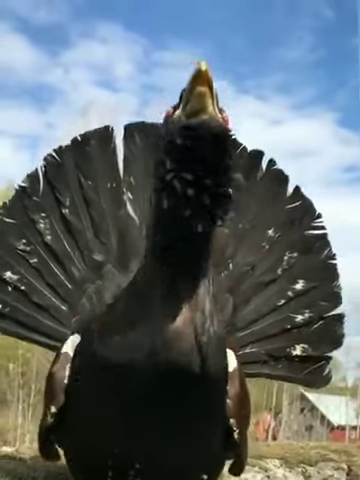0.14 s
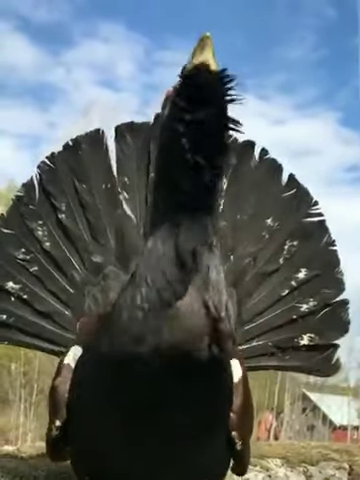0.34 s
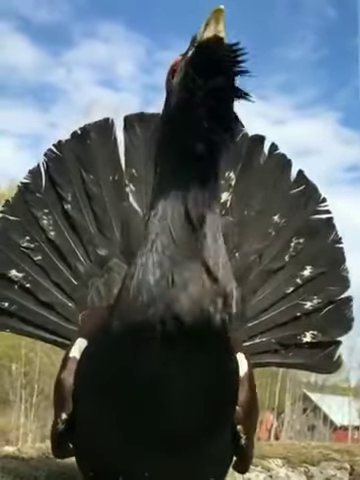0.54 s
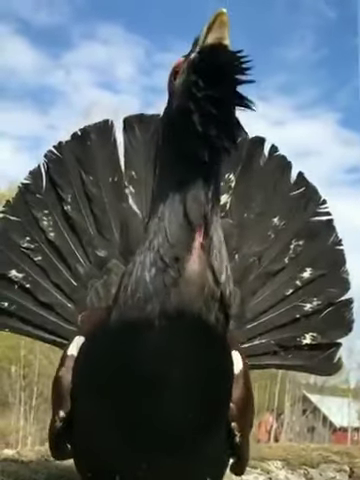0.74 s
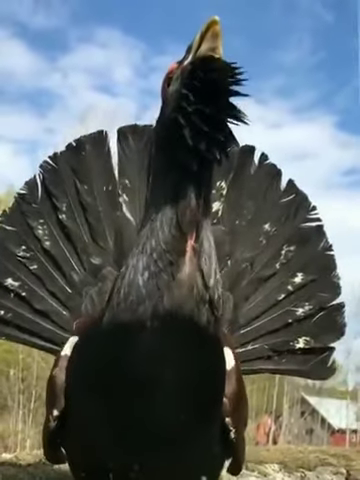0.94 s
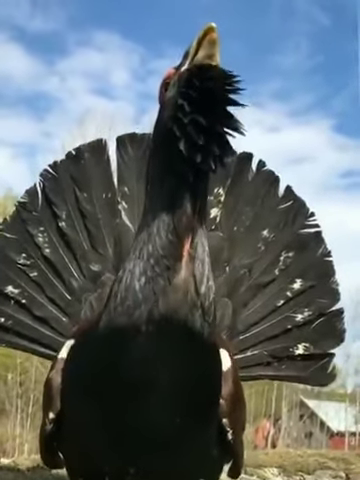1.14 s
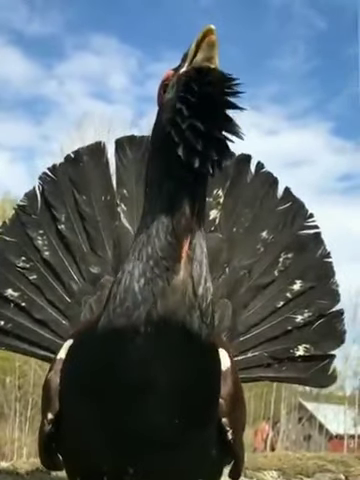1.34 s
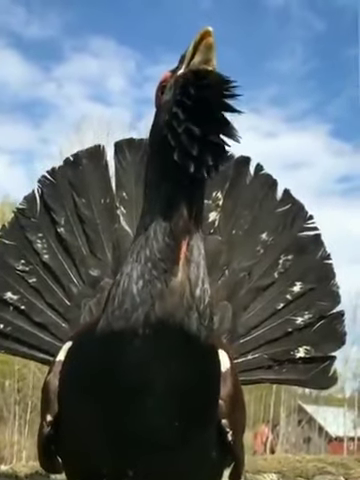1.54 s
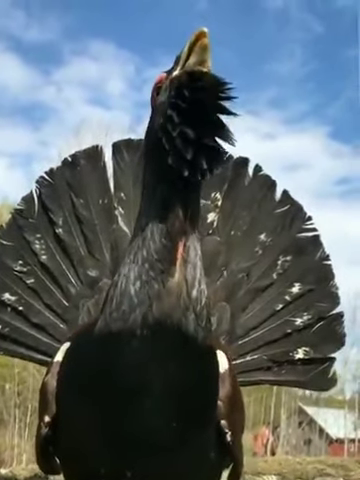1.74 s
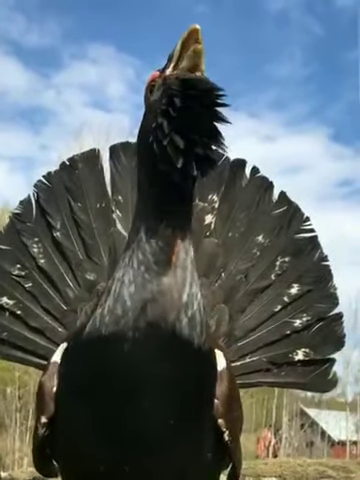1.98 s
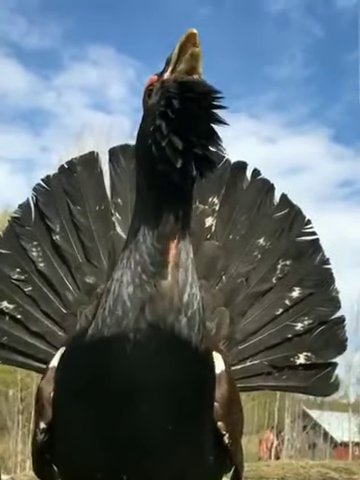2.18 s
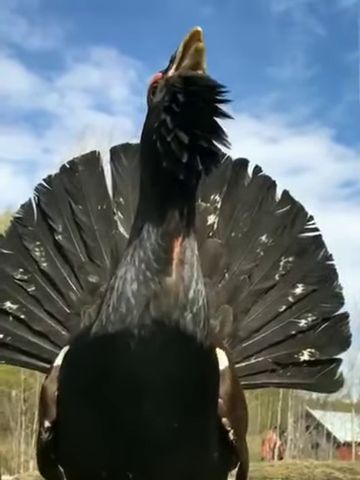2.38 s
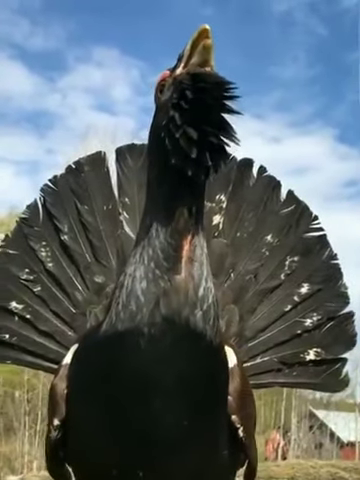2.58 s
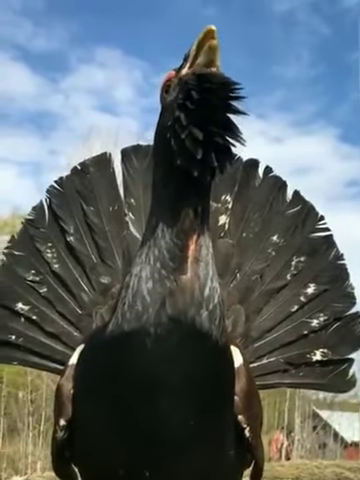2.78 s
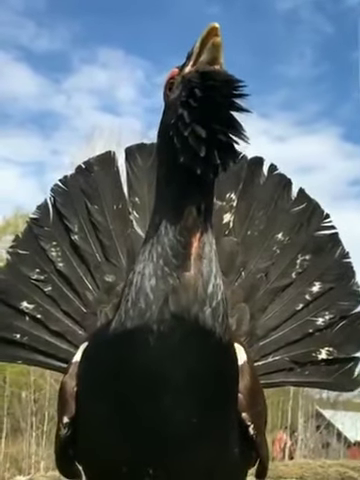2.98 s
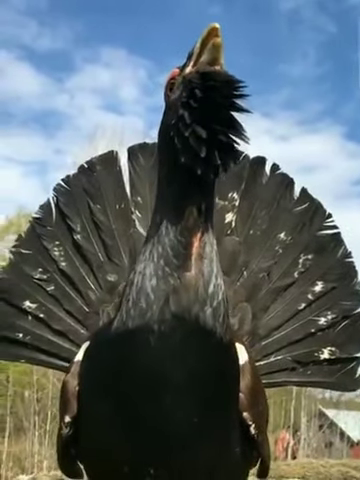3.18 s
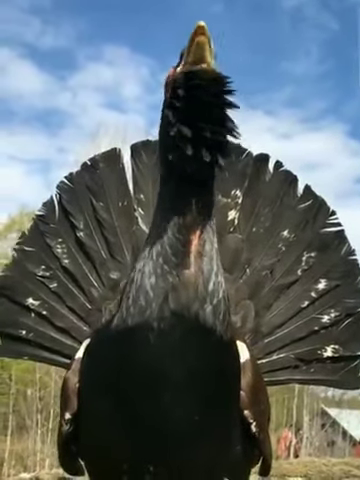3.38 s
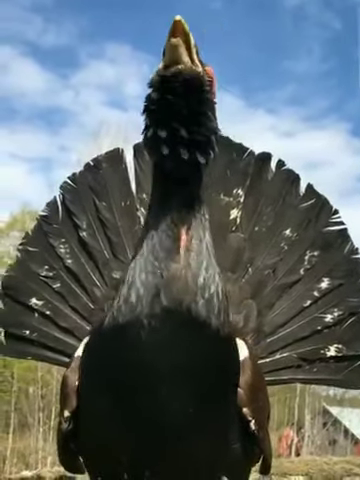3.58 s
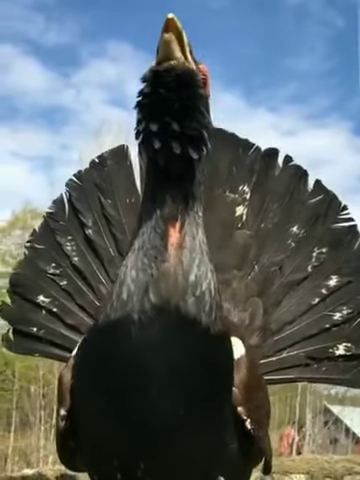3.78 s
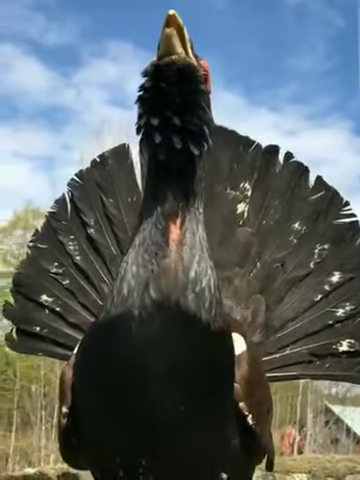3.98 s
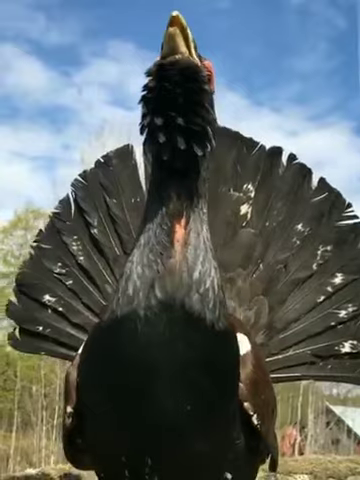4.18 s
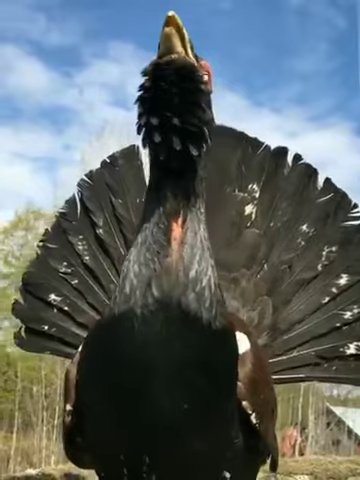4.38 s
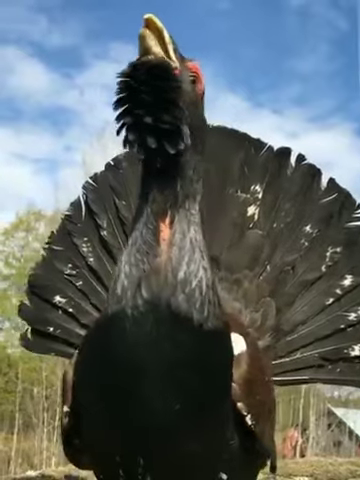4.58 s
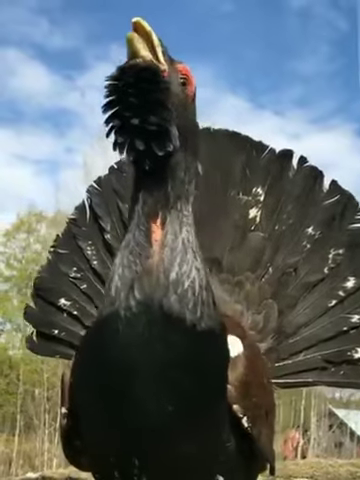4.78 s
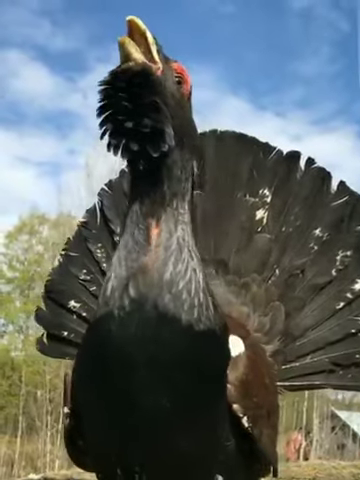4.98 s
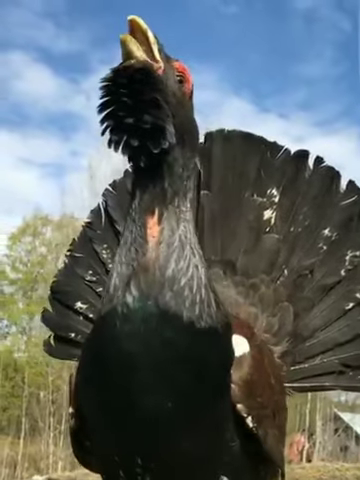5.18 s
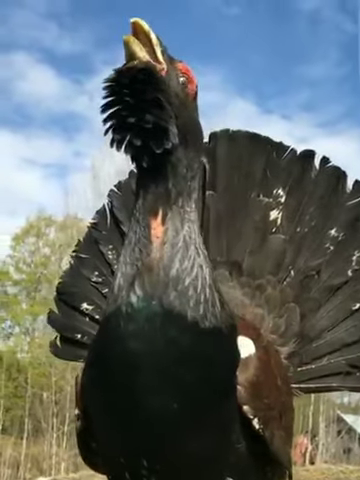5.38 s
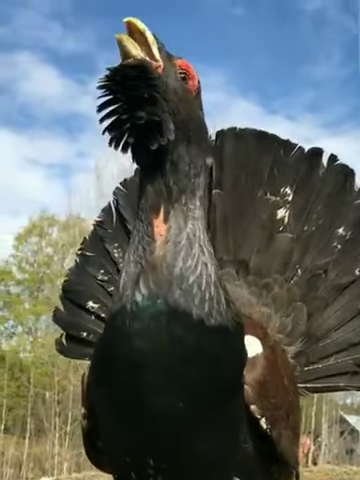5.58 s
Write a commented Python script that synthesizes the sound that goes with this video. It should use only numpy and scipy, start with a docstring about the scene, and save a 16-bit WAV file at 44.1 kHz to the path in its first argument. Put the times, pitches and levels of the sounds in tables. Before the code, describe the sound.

A large forest bird gives a cork-like pop running into a rasping, rattling scrape, then three lone hollow clicks over faint engine hum and light wind.

```python
"""Forest edge, a male capercaillie close to the microphone: the faint ringing end of a click made just before
the start, then a cork-like pop of ringing modes runs into scraping strokes of hissing, rattling air, with low
gulps; his grainy feathers rustle and snap. Three lone, hollow clicks follow. From about 1.2 s light wind bumps
the microphone with short low swings; from about 2.5 s small far songbirds whistle gliding dips and slurs.
All through, a far engine hums on two wavering tones in the soft coloured noise of open air."""
import sys
import numpy as np
from scipy import signal
from scipy.fft import rfft, irfft, next_fast_len
from scipy.io import wavfile
from scipy.ndimage import uniform_filter1d

SR = 44100
rng = np.random.default_rng(int(sys.argv[2]) if len(sys.argv) > 2 else 0)


def master_out(mix):
    """Clip the mix to full scale and print it as 16-bit PCM to the path in sys.argv[1]."""
    frames = np.transpose(np.atleast_2d(mix))
    ceiling = np.clip(frames, -1, 1)
    pcm = np.round(ceiling * 32767).astype(np.int16)
    wavfile.write(sys.argv[1], SR, pcm)


N = 248283
TIME = np.arange(N) / SR

# Levels in the tables are relative; they are taken before the trims, reflections and final filters.

# Close by: clicks of bill and throat; the first row is the ringing end of a click made just before the start:
# (t/s, level/dB, mouth pitch factor, crack level/dB, hollow level/dB)
BILL_CLICKS = [(0.0004, -14, 1, -6, -3), (0.1698, 2, 1, 1.5, -1), (0.2718, -18, .85, 13, 5),
               (1.8722, 1, .98, 1.5, -.5), (3.4469, -1.5, 1.005, 1, -1), (4.8585, -.5, 1, .5, -.5)]
# Soft after-clicks as the throat relaxes: (t/s, level/dB)
THROAT_AFTER_CLICKS = [(2.016, -39.5), (2.041, -45), (3.482, -39), (3.577, -36), (3.59, -45), (4.984, -39),
                       (5.007, -48)]
# Modes of the inflated neck: (f/Hz, level/dB, t60/s)
NECK_MODES = [(200, -23, .024), (315, -16.5, .021), (422, -18.5, .039), (570, -36, .03), (855, -29.5, .042),
              (1598, -27, .058)]
# Modes of the open mouth, before the pitch factor: (f/Hz, level/dB, t60/s)
MOUTH_MODES = [(2288, -13.5, .036), (2730, -20, .027), (3075, -23, .024), (3315, -17.5, .025),
               (3900, -20, .019), (4380, -28, .02), (5730, -33, .028), (6550, -41, .02)]
# Spectrum of the crack that starts a click: (f/Hz, level/dB)
CRACK_SPECTRUM = [(600, -30), (1700, -24), (2300, -3), (3150, 0), (4100, -5), (5000, -19), (7800, -26),
                  (8700, -37), (10200, -28), (15500, -47)]
# Spectrum of the short puff of air in each click: (f/Hz, level/dB per Hz)
PUFF_SPECTRUM = [(1000, -13), (2600, 1.5), (4200, 1.5), (5200, -11.5), (7800, -17), (8700, -20.5),
                 (10300, -14), (15500, -23.5)]

# Scraping strokes, pitches as at the top of the stroke:
# (top t/s, length/s, level/dB, throat f/Hz, whistle f/Hz, whistle level/dB, rattle share of power 0-1)
SCRAPE_STROKES = [(0.183, 0.042, -25.5, 4270, 7070, 10.5, 0.17), (.213, 0.073, -25.5, 2310, 5730, 14, 0.12),
                  (0.253, 0.035, -29.5, 2830, 5400, -9, 0.5), (.286, 0.05, -29.5, 2910, 5170, 18, .2),
                  (0.341, 0.076, -36, 3010, 5060, 16.5, 0.2), (.363, 0.052, -22.5, 2935, 5150, 14, 0.7),
                  (.388, 0.046, -26.5, 2665, 4310, 11, .8), (0.425, 0.039, -34, 1740, 3500, -2, 0.74),
                  (0.439, 0.048, -32, 3360, 5370, 13.5, 0.6), (0.494, 0.091, -45, 3320, 5060, 15, 0.43)]
# Spectrum of the scraping air: (f/Hz, level/dB per Hz)
SCRAPE_SPECTRUM = [(200, -11.5), (800, -13.5), (1080, -22), (1500, -2.5), (1850, -3), (2700, -4),
                   (3500, -6), (5400, -7), (6100, -6.5), (7600, -7.5), (8500, -20), (9600, -11.5),
                   (12800, -18), (15800, -31)]
# Steady resonances of the windpipe: (f/Hz, width/Hz, level/dB)
WINDPIPE_RESONANCES = [(1441, 70, 1), (2190, 60, 1), (2590, 50, 3), (3012, 45, 5), (3712, 45, 3),
                       (4070, 45, 3), (4405, 45, 2), (4770, 70, 1), (5123, 35, 2), (5270, 35, 4),
                       (5550, 110, 2), (7260, 90, 3)]
# Low pulses of the pumping neck: (top t/s, level/dB, f/Hz)
NECK_GULPS = [(.217, -46.5, 329), (.264, -31, 322.5), (.275, -33, 113.7), (.312, -39.5, 178),
              (.316, -38.5, 325), (.337, -40, 317.5), (.376, -46.5, 354), (.412, -49.5, 327),
              (.505, -49.5, 409)]

# Feathers snapping: (t/s, peak level/dB)
FEATHER_FLICKS = [(0.5372, -33), (.565, -41), (0.584, -35), (.602, -60), (.626, -47), (.636, -46),
                  (1.994, -50), (2.133, -54)]
# Grainy hisses: the first row is a very faint early hiss, the others are feathers sliding as the bird shifts:
# (top t/s, level/dB)
GRAINY_HISSES = [(.05, -67), (.53, -55.5), (0.604, -63.5), (2.02, -73), (2.13, -78), (3.665, -68)]
# Spectrum of the feathers and the early hiss: (f/Hz, level/dB per Hz)
FEATHER_SPECTRUM = [(800, -21.5), (2300, -1.5), (4000, -2), (6800, -3), (8700, -8.5), (12500, -3),
                    (15800, -11)]

# Diffuse reflections around the near bird, one row each: (level/dB, t60/s, top f/Hz)
GROUND_REFLECTION = (-27.5, .12, 4900)
TREE_REFLECTION = (-47, .9, 4000)

# On the microphone: wind bumps: (top t/s, level/dB)
WIND_BUMPS = [(1.18, -43.5), (1.31, -52), (1.47, -49.5), (1.62, -46), (2.12, -51), (2.199, -49.5),
              (2.47, -49), (2.671, -46), (3.03, -48.5), (3.295, -36.5), (3.432, -41.5), (3.478, -39),
              (3.589, -44), (3.916, -45.5), (4.265, -48.5)]
# Spectrum of wind noise on the microphone: (f/Hz, level/dB per Hz)
GUST_SPECTRUM = [(25, 0.5), (55, 6.5), (110, -3.5), (220, -4.5), (400, -33), (900, -43), (4000, -76)]

# Far songbirds: pitch of the opening note, before the spread: (f/Hz evenly along the note)
OPENING_NOTE_HZ = (6050, 5380, 5450, 6450)
# Upward slurs, before the spread: (t/s, starting f/Hz, level/dB)
SONG_UPSLURS = [(3.14, 4050, -70), (3.31, 3800, -73), (3.54, 3800, -69), (3.72, 3450, -68),
                (3.855, 4300, -70), (4.04, 3250, -70), (4.245, 3250, -71), (4.57, 2950, -73)]
# Downward slurs, before the spread: (t/s, starting f/Hz, level/dB)
SONG_DOWNSLURS = [(2.81, 3750, -75), (3.10, 3650, -72), (3.21, 4600, -66), (3.715, 3500, -71),
                  (3.96, 3550, -71), (4.06, 3600, -70), (4.43, 3600, -70)]

# Far engine, level curves of its two tones: (t/s, low tone level/dB, upper tone level/dB)
ENGINE_LEVELS = [(0.0, -51.5, -55.5), (0.97, -52, -56), (1.22, -61.5, -60.5), (1.58, -58, -64),
                 (2.56, -65, -58), (3.26, -58.5, -57.5), (4.03, -67.5, -66.5), (4.69, -59.5, -60.5),
                 (5.63, -62, -62)]
# Spectrum of open air: (f/Hz, level/dB per Hz)
AIR_SPECTRUM = [(20, -20.5), (48, 5.5), (100, -0.5), (170, -6), (260, -12.5), (450, -15.5), (800, -13),
                (1500, -17), (2200, -26.5), (3500, -32), (8000, -38), (10000, -43.5), (12500, -40),
                (15500, -44)]

# Scrape
STROKE_RISE = .45  # share of a stroke spent swelling
WINDPIPE_DB = 3.5  # added to every windpipe resonance
THROAT_WIDTH_HZ, THROAT_DB, WHISTLE_WIDTH_HZ = 200, 15, 190
THROAT_SLIDE_PER_S, WHISTLE_SLIDE_PER_S = 1.5, -.7  # relative change of pitch
SURGE_DB, SURGE_POINTS_PER_S = 1.3, 220
RATTLE_HZ, RATTLE_JITTER, FLUTTER_DB = 688.3, .25, 0.5  # jitter is in log pitch

# Gulps and feathers
GULP_ATTACK_S, GULP_RELEASE_S, GULP_WAVER = .011, .024, .11
GULP_OVERTONE_RATIO, GULP_OVERTONE_DB = 2.35, -13.5
HISS_ATTACK_S, HISS_RELEASE_S = 0.021, .05  # time constants

# Wind
BUMP_DB, BUMP_HZ = -45, 63.1  # a typical bump
BUMP_DB_PER_OCTAVE = 21.5  # harder bumps are higher and shorter
BUMP_ATTACK_CYCLES, BUMP_RELEASE_CYCLES = 1.794, 2.3
KNOCK_HZ, KNOCK_DB, KNOCK_ATTACK_S, KNOCK_RELEASE_S = 189.7, -9.5, 0.012, .022

# Songbirds
OPENING_S, OPENING_STEP_S, OPENING_DB = 2.485, .135, -67.5
UPSLUR_OCTAVES, DOWNSLUR_OCTAVES, NOTE_S = .35, .48, .078
NOTE_SPREAD = 0.0144  # relative pitch difference from note to note
TWITTER_SPAN_S, TWITTER_RANGE_HZ, TWITTER_DB = (3.4, 4.1), (2900, 4100), -74
SONG_DB = -1.5

# Engine, open air and final filter
ENGINE_HZ, ENGINE_GAINS_DB = (89, 141.5), (1.5, 1)  # low tone, upper tone
AIR_DB = -56
CUTOFF_HZ = 16000


def clicking():
    """The clicks of bill and throat, and their soft followers from the relaxing throat."""
    out = np.zeros(N)
    for s, db, pitch, crack_db, hollow_db in BILL_CLICKS:
        add(out, s, from_db(db) * click(pitch, crack_db, hollow_db))
    for s, db in THROAT_AFTER_CLICKS:
        add(out, s, from_db(db) * click(1, crack_db=-5.0, hollow_db=12.5))
    return out


def click(pitch, crack_db, hollow_db):
    """A sharp release cracks and puffs, rings the mouth and, a little later, the neck."""
    t = np.arange(SR // 8) / SR
    mouth_rise_s, neck_rise_s, puff_t60 = .001, .0042, 0.02976
    crack = coloured(signal.unit_impulse(len(t)), CRACK_SPECTRUM)
    crack = from_db(-8.0) * crack / np.abs(crack).max()
    puff = rms_one(coloured(rng.standard_normal(len(t)), PUFF_SPECTRUM))
    puff = from_db(-24.5 - 60 * t / puff_t60) * puff
    mouth = ring(MOUTH_MODES, t, pitch, spread_db=1) * (1 - np.exp(-(t / mouth_rise_s) ** 2))
    neck = ring(NECK_MODES, t, pitch=1, spread_db=1) * (1 - np.exp(-(t / neck_rise_s) ** 2))
    return from_db(crack_db) * (crack + puff) + from_db(0.5) * mouth + from_db(hollow_db) * neck


def ring(modes, t, pitch, spread_db):
    """Damped modes, each struck with a strength and phase of its own."""
    hz, db, t60 = np.transpose(modes)[:, :, None]
    strength = from_db(db + spread_db * rng.standard_normal(db.shape))
    wave = np.sin(2 * np.pi * (pitch * hz * t + rng.random(hz.shape)))
    return np.sum(strength * from_db(-60 * t / t60) * wave, axis=0)


def scraping():
    """Forced air hisses and rattles through the windpipe; strokes stress a throat resonance and a whistle."""
    out, size = np.zeros(N), SR // 4
    t = (np.arange(size) - size // 2) / SR  # zero at the top of the stroke
    for top, length, db, throat_hz, whistle_hz, whistle_db, rattle in SCRAPE_STROKES:
        air = rattling_air(np.clip(rattle, 0, 1), size)
        piped = air.copy()
        for hz, width, peak_db in WINDPIPE_RESONANCES:
            piped += from_db(peak_db + WINDPIPE_DB) * resonate(air, hz, width)
        # uneven reading slides the throat resonance up and lets the whistle sag
        throat = resonate(piped, throat_hz, THROAT_WIDTH_HZ)
        throat = np.interp(t + THROAT_SLIDE_PER_S * t ** 2 / 2, t, throat)
        whistle = resonate(piped, whistle_hz, WHISTLE_WIDTH_HZ)
        whistle = np.interp(t + WHISTLE_SLIDE_PER_S * t ** 2 / 2, t, whistle)
        voiced = piped + from_db(THROAT_DB) * throat + from_db(whistle_db) * whistle
        # the flow is steady within a stroke, apart from small quick surges
        steady = voiced / np.sqrt(uniform_filter1d(voiced ** 2, size=SR // 100) + 1e-18)
        flow = steady * from_db(SURGE_DB * drift(SURGE_POINTS_PER_S, size=size))
        shape, rise = swell(length, STROKE_RISE), STROKE_RISE * length
        first = size // 2 - int(rise * SR)
        add(out, top - rise, from_db(db) * shape * flow[first:first + len(shape)])
    return out


def rattling_air(rattle, size):
    """Hiss mixed by power with a train of unevenly timed and unevenly strong pulses."""
    cycles = np.cumsum(RATTLE_HZ * np.exp(RATTLE_JITTER * drift(600, size=size))) / SR
    pulses = np.diff(np.floor(cycles), prepend=0)  # one pulse per whole cycle
    pulses = pulses * from_db(FLUTTER_DB * drift(500, size=size))
    hiss = rng.standard_normal(size)
    return coloured(np.sqrt(1 - rattle) * hiss - np.sqrt(rattle) * rms_one(pulses), SCRAPE_SPECTRUM)


def gulping():
    """Each pump of the neck sounds its hollow note and a weak overtone."""
    out = np.zeros(N)
    for top, db, note_hz in NECK_GULPS:
        for hz, partial_db in ((note_hz, 0), (GULP_OVERTONE_RATIO * note_hz, GULP_OVERTONE_DB)):
            pulse = thud(hz, GULP_ATTACK_S, GULP_RELEASE_S, GULP_WAVER, waver_rate=290)
            add(out, top - GULP_ATTACK_S, from_db(db + partial_db) * pulse)
    return out


def feathers_and_early_hiss(flick_t60=0.0086):
    """Stiff feathers slide with a grainy hiss and snap past each other; a faint early hiss shares the grain."""
    t = np.arange(SR // 20) / SR
    grain = rms_one(rng.standard_normal(N) * from_db(2.5 * drift(250)))
    level = np.zeros(N)
    for top, db in GRAINY_HISSES:
        away = np.maximum((top - TIME) / HISS_ATTACK_S, (TIME - top) / HISS_RELEASE_S)
        level += from_db(db) * np.exp(-away)
    out = level * rms_one(coloured(grain, FEATHER_SPECTRUM))
    for s, db in FEATHER_FLICKS:
        flick = coloured(rng.standard_normal(len(t)) * from_db(-60 * t / flick_t60), FEATHER_SPECTRUM)
        add(out, s, from_db(db) * flick / np.abs(flick).max())
    return out


def wind():
    """Each puff of wind bumps the microphone for a few cycles and leaves low turbulence around it."""
    bumps = np.zeros(N)
    for top, db in WIND_BUMPS:
        hz = BUMP_HZ * 2 ** ((db - BUMP_DB) / BUMP_DB_PER_OCTAVE)
        attack, release = BUMP_ATTACK_CYCLES / hz, BUMP_RELEASE_CYCLES / hz
        bump = thud(hz, attack, release, waver=0.36, waver_rate=130)
        add(bumps, top - attack, from_db(db) * bump)
        # a short knock at the front of the bump
        knock = thud(KNOCK_HZ, KNOCK_ATTACK_S, KNOCK_RELEASE_S, waver=0.23, waver_rate=194)
        add(bumps, top - attack, from_db(db + KNOCK_DB) * knock)
    strength = uniform_filter1d(np.abs(bumps), size=SR // 16)
    turbulence = strength * rms_one(coloured(rng.standard_normal(N), GUST_SPECTRUM))
    return from_db(-1.0) * bumps + from_db(-3.5) * turbulence


def songbirds(waver=.014, twitters=7):
    """Thin gliding whistles of one length and three shapes: dips, upward slurs and downward slurs."""
    out, shape = np.zeros(N), np.sqrt(swell(NOTE_S, 0.37))
    along = np.linspace(0, 1, len(shape))
    dip = np.polyval(np.polyfit(np.arange(4) / 3, OPENING_NOTE_HZ, 3), along)
    up, down = 2 ** (UPSLUR_OCTAVES * along), 2 ** (-DOWNSLUR_OCTAVES * along)
    notes = [(OPENING_S + k * OPENING_STEP_S, dip, OPENING_DB) for k in range(5)]
    notes += [(s, hz * up, db) for s, hz, db in SONG_UPSLURS]
    notes += [(s, hz * down, db) for s, hz, db in SONG_DOWNSLURS]
    # others twitter at random behind them, slurring up or down
    for k in range(twitters):
        s, start_hz = rng.uniform(*TWITTER_SPAN_S), rng.uniform(*TWITTER_RANGE_HZ)
        notes.append((s, start_hz * (up, down)[k % 2], TWITTER_DB))
    for s, hz, db in notes:
        detune = NOTE_SPREAD * rng.standard_normal() + waver * drift(400, size=len(shape))
        cycles = np.cumsum(hz * (1 + detune)) / SR
        add(out, s, from_db(db) * shape * np.sin(2 * np.pi * cycles))
    return out


def distant_song():
    """Distance makes the song flutter and smears it among the trees."""
    song = songbirds() * from_db(SONG_DB + 3.5 * drift(90))
    return song + from_db(-6) * scattered(song, t60=.4, top_hz=7000)


def engine(waver=.012):
    """Two low tones carry from far away, wavering a little in pitch and level."""
    out = np.zeros(N)
    s, *curves = np.transpose(ENGINE_LEVELS)
    for hz, curve, gain_db in zip(ENGINE_HZ, curves, ENGINE_GAINS_DB):
        db = np.interp(TIME, s, curve)
        cycles = np.cumsum(hz * (1 + waver * drift(9.8))) / SR
        level = from_db(db + gain_db + 1.5 * drift(14))
        out += np.sqrt(2) * level * np.sin(2 * np.pi * cycles)
    return out


def open_air():
    """Coloured noise of the open place, its level drifting slightly."""
    return from_db(AIR_DB + .5 * drift(4.2)) * rms_one(coloured(rng.standard_normal(N), AIR_SPECTRUM))


def thud(hz, attack, release, waver, waver_rate):
    """A short low pressure swing of unsteady pitch."""
    shape = swell(attack + release, attack / (attack + release))
    cycles = np.cumsum(hz * np.exp(waver * drift(waver_rate, size=len(shape)))) / SR
    return shape * np.sqrt(2) * np.sin(2 * np.pi * cycles)


def scattered(x, t60, top_hz):
    """Diffuse reflections from the surroundings: a decaying, low-passed noise tail of unit energy."""
    t = np.arange(SR) / SR
    tail = rng.standard_normal(SR) * from_db(-60 * t / t60)
    tail = signal.sosfilt(signal.butter(1, min(top_hz, SR / 3), fs=SR, output="sos"), tail)
    return signal.fftconvolve(x, tail / np.sqrt(np.sum(tail ** 2)))[:N]


def resonate(x, hz, width_hz):
    """One resonance as a two-pole filter, gain about 1 on top."""
    r = np.exp(-np.pi * width_hz / SR)
    poles = [1, -2 * r * np.cos(2 * np.pi * hz / SR), r * r]
    return signal.lfilter(np.array([1, 0, -1]) * (1 - r * r) / 2, poles, x)


def coloured(x, spectrum):
    """Causal (minimum-phase) filter that follows a spectrum."""
    size = 2 * next_fast_len(len(x) // 2 + 1)
    hz, db = np.transpose(spectrum)
    grid = np.maximum(np.arange(size // 2 + 1) * SR / size, 1)
    cepstrum = irfft(np.log(from_db(np.interp(np.log(grid), np.log(hz), db))))
    # folding the cepstrum forward gives the minimum phase
    cepstrum[1:size // 2] *= 2
    cepstrum[size // 2 + 1:] = 0
    return irfft(rfft(x, size) * np.exp(rfft(cepstrum)))[:len(x)]


def drift(rate, size=N):
    """Random points, rate per second, joined by straight lines; spread near 1."""
    at = np.arange(size) * rate / SR
    return np.interp(at, np.arange(2000), rng.standard_normal(2000))


def swell(length, rise_share):
    """A rounded rise and fall over a length in seconds."""
    along = np.linspace(0, 1, int(length * SR))
    ramp = np.interp(along, [0, np.clip(rise_share, .05, .95), 1], [0, 1, 0])
    return np.sin(np.pi / 2 * ramp) ** 1.2


def from_db(db):
    """Decibels to gain."""
    return 10 ** (np.asarray(db) / 20)


def rms_one(x):
    """Scale to unit power."""
    return x / np.sqrt(np.mean(x ** 2) + 1e-20)


def add(out, s, sound):
    """Mix a sound in at a time in seconds."""
    i = max(0, round(s * SR))
    out[i:i + len(sound)] += sound[:N - i]


def scene():
    """The near bird, almost dry, over the far surroundings."""
    bird = clicking() + from_db(-1.0) * scraping() + gulping() + feathers_and_early_hiss()
    reflections = np.zeros(N)
    for db, t60, top_hz in (GROUND_REFLECTION, TREE_REFLECTION):
        reflections += from_db(db) * scattered(bird, t60, top_hz)
    return (bird + reflections + wind() + distant_song() + engine() + open_air())[None]


def record(dry):
    """The microphone loses the deepest rumble and the top is cut."""
    thinned = signal.sosfilt(signal.butter(2, 30, "high", fs=SR, output="sos"), dry)
    return signal.sosfilt(signal.ellip(10, .1, 70, CUTOFF_HZ, fs=SR, output="sos"), thinned)


dry = scene()
out = record(dry)
master_out(out)
```